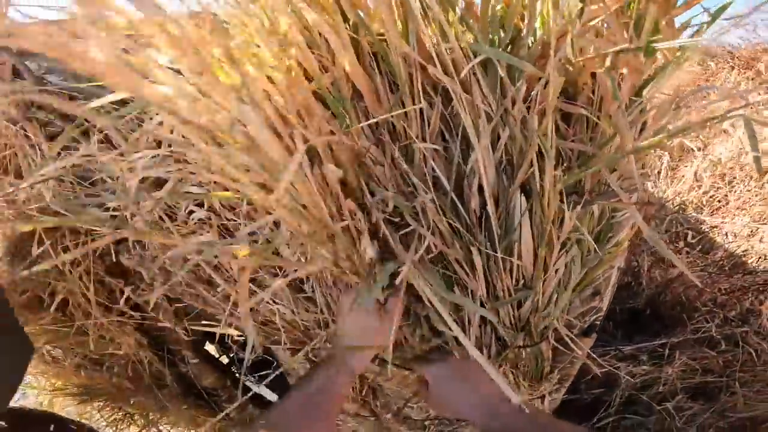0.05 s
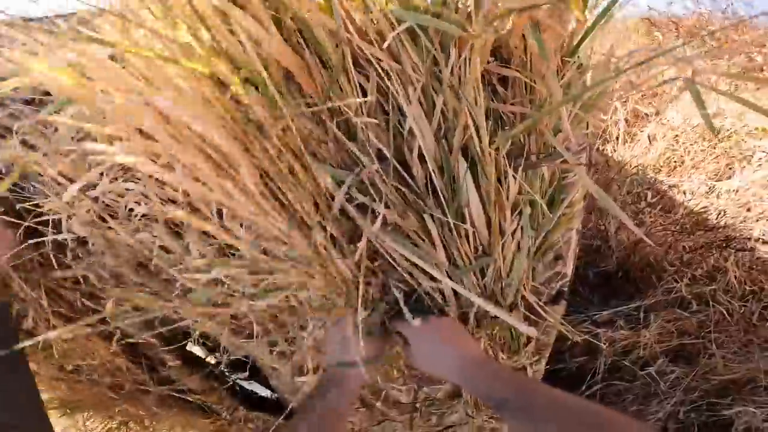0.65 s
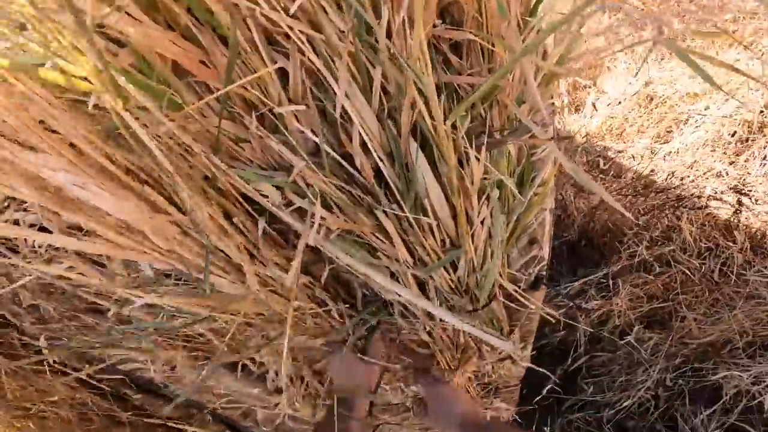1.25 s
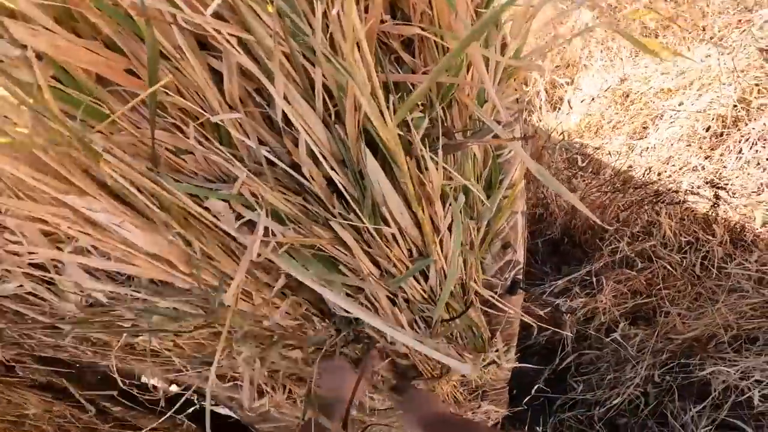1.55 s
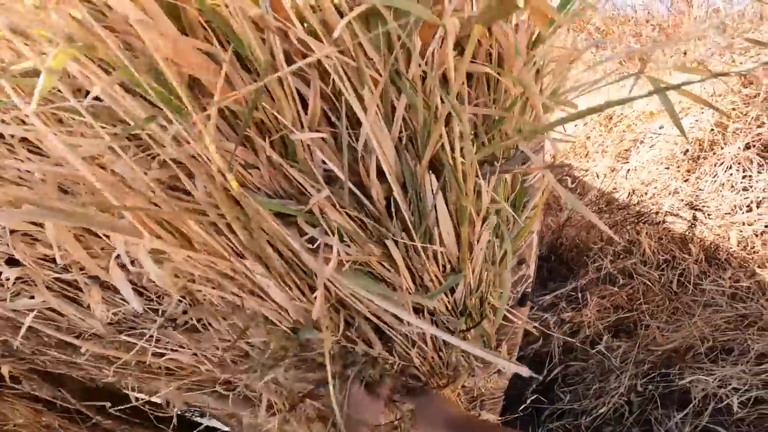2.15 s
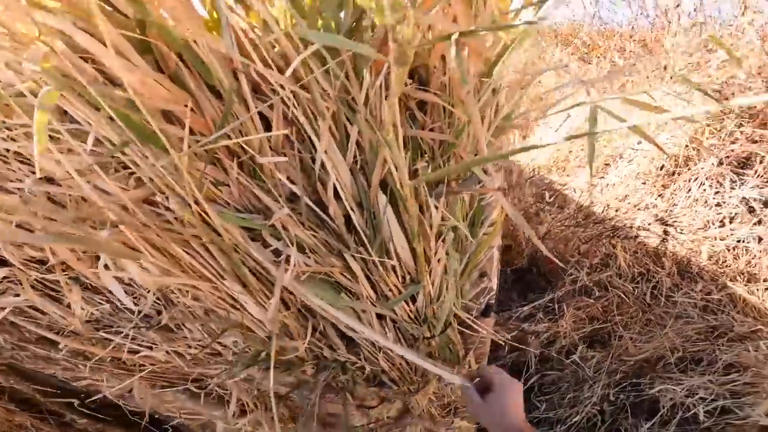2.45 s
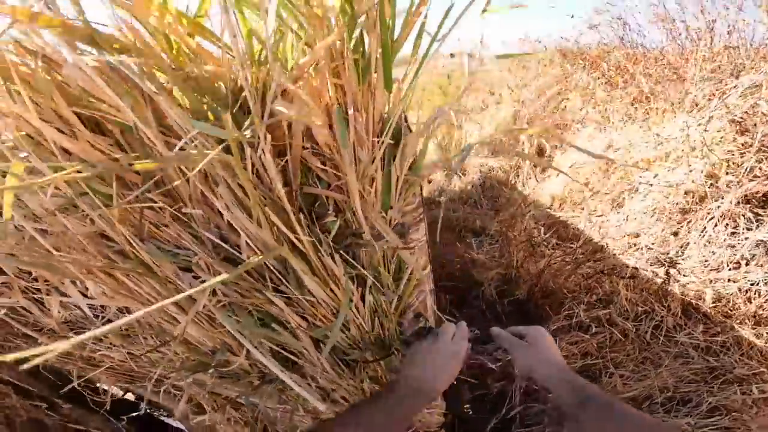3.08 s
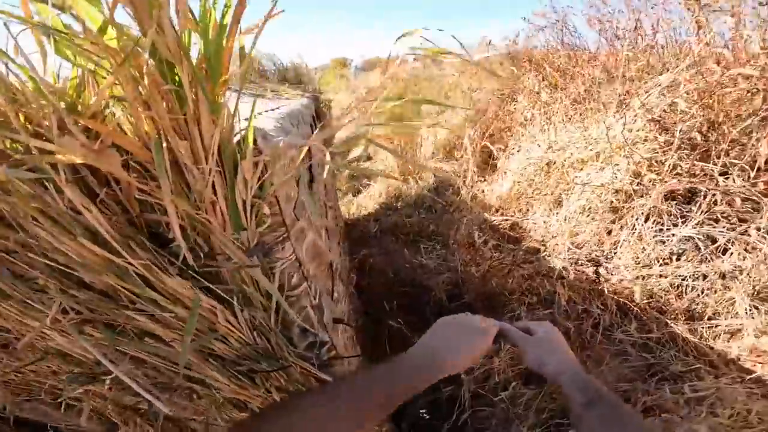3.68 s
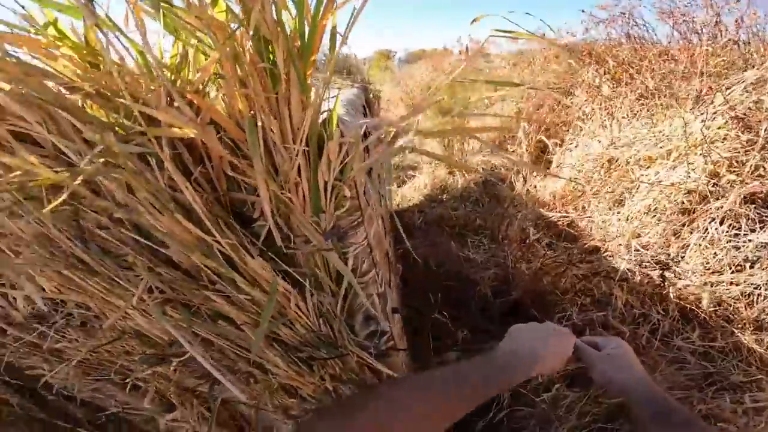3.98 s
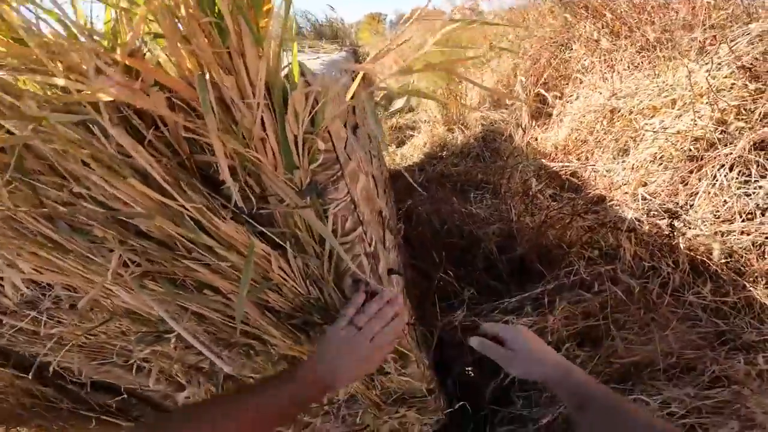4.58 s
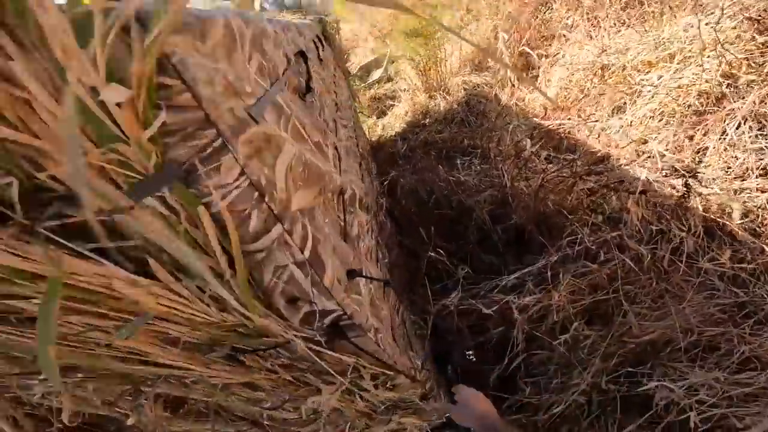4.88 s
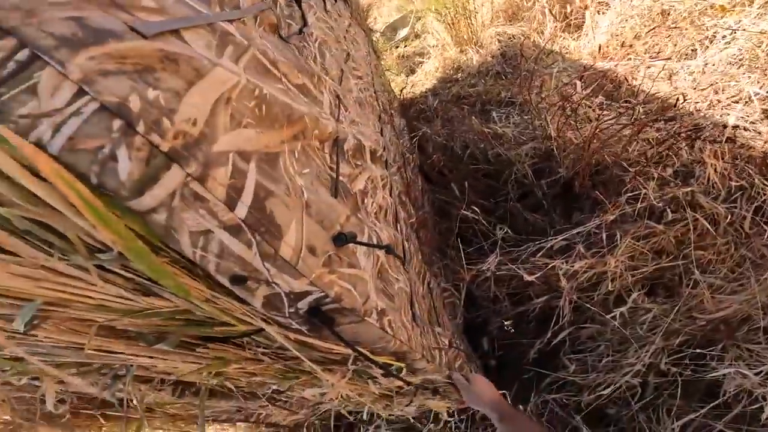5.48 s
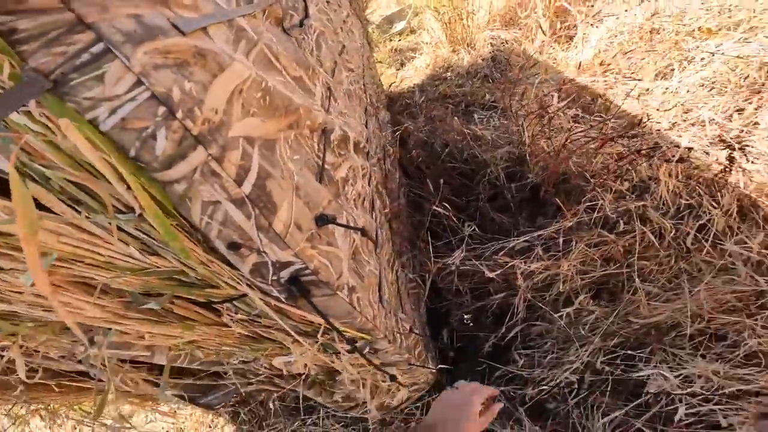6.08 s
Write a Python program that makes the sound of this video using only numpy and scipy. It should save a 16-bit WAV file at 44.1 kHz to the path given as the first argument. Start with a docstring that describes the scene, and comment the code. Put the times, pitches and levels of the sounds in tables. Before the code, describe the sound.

Dry reeds rustle, crackle and scrape close up as hands push and tie them onto a hunting blind, with wind buffeting the microphone.

```python
"""Dry reed grass, pushed by hand onto a hunting blind and tied down, close to a body-worn camera.
Slipping leaves rasp and hiss; stiff stalks crack, scrape the blind and rub and bump the camera case.
The tie cord zips and creaks, and a hand knocks the frame.
After an opening low handling thump on the camera, wind gusts buffet the microphone.
A faint far-off drone shows over the open field in the lull. Midway the top treble turns dull and mono."""
import sys
import numpy as np
from scipy.fft import rfft, irfft, next_fast_len
from scipy.io import wavfile
from scipy.ndimage import uniform_filter1d, map_coordinates

SR = 44100
rng = np.random.default_rng(int(sys.argv[2]) if len(sys.argv) > 2 else 0)


def int16_out(signal):
    """Quantize to a 16-bit WAV file."""
    q = np.round(np.clip(np.atleast_2d(signal).T, -1, 1) * 32767)
    wavfile.write(sys.argv[1], SR, q.astype(np.int16))


N = 279726

# hands pushing the bundle: start_s, length_s, rasp_db, hiss_db
PUSHES = [(0.0, 0.17, -36, -42.5), (0.12, 0.16, -39, -42.5), (0.29, 0.12, -43, -40.5),
          (0.52, 0.063, -39.5, -38.5), (0.6, 0.11, -47, -49), (0.7, 0.068, -37, -37),
          (0.81, 0.16, -52, -44.5), (1.12, .07, -42.5, -47.5), (1.22, 0.12, -41, -45),
          (1.46, 0.23, -40.5, -45), (1.65, 0.066, -35, -41), (1.815, 0.15, -36.5, -40.5),
          (2.035, 0.17, -42, -43.5), (2.2, 0.12, -42, -41.5), (2.335, 0.076, -37.5, -44.5),
          (2.56, 0.16, -42, -61), (2.66, 0.14, -37, -48), (2.86, 0.16, -46, -49.5),
          (3.01, 0.21, -42.5, -43), (3.19, 0.15, -39.5, -47.5), (3.46, 0.075, -46.5, -52),
          (3.735, .06, -51.5, -52), (3.84, 0.12, -53, -46), (3.925, 0.13, -46, -39),
          (4.12, 0.18, -48.5, -48.5), (4.22, .17, -39, -39), (4.48, 0.12, -47.5, -50),
          (5.39, .12, -74, -63), (5.6, .06, -56, -63), (5.665, .065, -44.5, -48.5), (5.74, .14, -44, -49),
          (5.955, 0.17, -41.5, -49.5)]
# leaves settling between pushes: time_s, rasp_db, hiss_db
SETTLING = [(0, -41.5, -45.5), (0.48, -40, -42.5), (1.02, -45.5, -48.5), (1.42, -45, -46.5),
            (1.79, -51, -54), (2.01, -51, -56), (2.5, -44, -51), (3.3, -43.5, -51.5), (3.7, -53, -65),
            (4.1, -50, -46.5), (4.6, -51.5, -51), (5.05, -57.5, -76), (5.55, -61.5, -66),
            (5.92, -47.5, -58), (6.34, -57, -57.5)]


def leaf_levels():
    """Pushes stir the leaves, which keep settling in between: rasp and hiss curves in dB."""
    return strokes(PUSHES, curves(SETTLING), attack_s=0.038, release_s=0.039, build_db=1)


# coarse leaf spectrum: freq_hz, gain_db
RASP_SPECTRUM = [(300, -41), (900, -1.5), (1500, 0.5), (3200, -1.5), (5000, -8.5), (7500, -15.5),
                 (11000, -36), (16000, -40)]
# fine leaf spectrum: freq_hz, gain_db
HISS_SPECTRUM = [(1200, -18), (3000, -1), (4800, 0), (6300, -2.5), (7500, -2), (9000, -11), (10800, -13.5),
                 (13000, -18), (16000, -17)]


def leaves(rasp_db, hiss_db):
    """Crushed blades rasp; blades that slide quickly hiss brighter."""
    rasp = amp(rasp_db) * coloured(friction(), RASP_SPECTRUM)
    hiss = amp(hiss_db) * coloured(friction(), HISS_SPECTRUM)
    return rasp + hiss


def friction():
    """Countless blade tips slip: a hiss with clumps of crackle."""
    crackle = slips(rate_hz=6000, spread_db=1.5, low_hz=863, high_hz=16100, cycles=1.54, samples=128)
    return unit(crackle * amp(0.66 * wobble(70)) + rng.standard_normal(N))


def leaf_fizz(rasp_db, hiss_db):
    """The finest crackle spurts and resonates in the two microphone ports, differently in each."""
    crackle = [slips(rate_hz=4300, spread_db=1.5, low_hz=10700, high_hz=15800, cycles=20, samples=64)
               for port in range(2)]
    ports = unit(filtered(np.array(crackle), lambda hz: resonance(hz, 12900, 2100) ** 2))
    level_db = 0.31 * rasp_db + 0.69 * hiss_db - 6
    spurts_db = 1.6 * wobble(22.03)
    balance_db = [[2.2], [-2.2]]
    return np.sqrt(treble_share()) * amp(level_db + spurts_db) * amp(balance_db) * ports


# stalks dragged over blind and camera: start_s, length_s, level_db
DRAGS = [(0.034, 0.097, -24), (0.13, 0.091, -33.5), (0.29, .035, -34), (0.33, 0.029, -29.5),
         (0.54, 0.066, -34), (0.72, 0.075, -38.5), (0.86, 0.05, -44), (1.07, 0.032, -37.5),
         (1.14, 0.053, -41), (1.245, 0.096, -34.5), (1.37, 0.36, -40.5), (1.68, 0.061, -25.5),
         (1.815, 0.16, -29.5), (2.12, .14, -40.5), (2.26, .05, -32), (3.19, 0.19, -42), (3.39, 0.25, -46),
         (4.21, 0.2, -41.5), (4.64, 0.34, -50), (5.77, 0.032, -41), (5.97, .15, -38)]
# stalk scrape spectrum: freq_hz, gain_db
SCRAPE_SPECTRUM = [(90, -28), (170, -2.5), (280, 0.5), (390, -3), (520, -2), (720, -6.5), (950, -8),
                   (1350, -12), (2200, -18), (4000, -33), (9000, -50)]
# rubbed camera case spectrum: freq_hz, gain_db
CASE_SPECTRUM = [(60, -31), (110, -26), (160, 5.5), (220, -8.5), (290, -1), (450, -14.5), (900, -30),
                 (2500, -43)]


def stalks(rasp_db):
    """Stems brush along with the leaves and drag; pressed hard, they make the camera case boom."""
    brush_db = rasp_db - 2.5
    stalk_db, = strokes(DRAGS, brush_db, attack_s=0.012, release_s=0.017, build_db=-1)
    pressed = 1 / (1 + amp(-2.5 * (stalk_db + 35.5)))  # 0-1, half at -35.5 dB
    scrape = amp(stalk_db - 1.36 * pressed) * coloured(judder(), SCRAPE_SPECTRUM)
    boom = steadied(coloured(judder(), CASE_SPECTRUM), span_s=0.059)
    return scrape + pressed * amp(stalk_db - 4.1) * boom


def judder():
    """Stiff stems catch and slip, coarse and low."""
    catches = slips(rate_hz=1700, spread_db=2.5, low_hz=130.2, high_hz=4000, cycles=1.46, samples=800)
    return unit(catches * amp(0.95 * wobble(45)) + 1.15 * rng.standard_normal(N))


# reeds on the camera: peak_s, sigma_s, pitch_hz, width_hz, level_db
REED_SCRAPES = [(.052, 0.026, 930, 410, -31), (.055, 0.015, 1350, 300, -26.5),
                (.083, 0.018, 1860, 410, -35), (.1, 0.016, 2770, 480, -32), (.119, 0.013, 1180, 690, -29),
                (1.88, .04, 320, 380, -30), (5.8, 0.11, 1360, 410, -52), (6.0, .015, 1300, 1640, -42.5)]


def hollow_reeds():
    """Hollow reeds ring as they drag over the camera."""
    return scrapes(REED_SCRAPES)


# stalks cracking: start_s, level_db, pitch_hz
CRACKS = [(0.0224, -11, 1200), (0.3152, -20, 1200), (0.3527, -18, 4300), (0.4465, -15, 2740),
          (1.1533, -27, 2120), (1.736, -23, 1890), (2.8014, -25, 1900), (3.0345, -31, 1920),
          (3.2504, -20, 1800), (4.271, -22, 4880), (5.689, -27, 2920), (5.867, -24, 1450)]
# blade tips flicking: start_s, level_db
FLICKS = [(1.5444, -25), (1.719, -18.5), (2.293, -23), (3.7738, -40), (5.8744, -37), (6.0774, -35)]


def snaps():
    """Stalks crack with a short hollow ring; thin blade tips flick far higher."""
    cracks = blows(CRACKS, cycles=2.4, noise_gain=0.58, noise_t60_s=0.018)
    cracks = filtered(cracks, lambda hz: resonance(hz, 2800, 4000))
    flicks = blows([(s, db, 13000) for s, db in FLICKS], cycles=4, noise_gain=1.5, noise_t60_s=0.009)
    flicks = filtered(flicks, lambda hz: resonance(hz, 14000, 9000))
    return cracks + flicks


# soft contacts: start_s, level_db, pitch_hz
BUMPS = [(0.012, -8, 202), (0.023, -4, 160), (0.04, -4.5, 227), (0.111, -14, 241), (0.353, -28, 175),
         (2.307, -19, 160), (2.628, -24, 280), (4.379, -35, 121), (4.523, -28.5, 262)]


def bumps():
    """Stalks and hands knock near the camera, with little treble."""
    knocks = blows(BUMPS, cycles=1.4, noise_gain=0.75, noise_t60_s=0.015)
    return filtered(knocks, lambda hz: 1 / (1 + 1j * hz / 1800) ** 2)


# blind frame modes: pitch_hz, gain_db, t60_s
FRAME_MODES = [(417, 1.5, 0.05), (497, -1.5, 0.064), (1480, -11, 0.018), (3340, -14, .016)]


def frame_knock(start_s=4.884, gain_db=-28):
    """The hollow frame rings briefly under a hand."""
    t = np.maximum(np.arange(N) / SR - start_s, 0)
    ring = sum(amp(db - 60 * t / t60_s) * np.sin(2 * np.pi * hz * t) for hz, db, t60_s in FRAME_MODES)
    return amp(gain_db) * ring


# cord pulls: start_s, length_s, level_db
PULLS = [(3.84, .22, -54), (4.23, .17, -55), (4.5, 0.13, -54), (5.39, 0.13, -63.5)]
# cord creaks: peak_s, sigma_s, pitch_hz, width_hz, level_db
CREAKS = [(3.32, 0.089, 480, 280, -40.5), (3.28, .06, 1360, 750, -42), (4.36, 0.051, 490, 300, -38),
          (4.926, .02, 3450, 420, -55.5)]


def tie_cord():
    """Taut cord zips through the fingers with a narrow hiss and creaks on the frame."""
    pull_db, = strokes(PULLS, rest_db=-np.inf, attack_s=0.063, release_s=0.044, build_db=1)
    hiss = unit(filtered(friction(), lambda hz: resonance(hz, 7200, 1100) ** 2))
    return amp(pull_db) * hiss + scrapes(CREAKS)


# handling thump (first row), then wind gusts: start_s, length_s, buffet_db, flutter_db
THUMP_AND_GUSTS = [(0.005, 0.034, -40, -23), (0.54, 0.11, -31.5, -39), (0.7, .08, -26, -28),
                   (0.78, 0.12, -30, -37), (1.36, 0.067, -31, -44), (1.87, 0.12, -40, -39.5),
                   (2.205, 0.1, -19, -26), (2.32, 0.094, -19.5, -31), (2.47, .09, -29.5, -33),
                   (2.575, .1, -22, -21), (2.69, 0.12, -26, -34), (2.79, 0.17, -28.5, -28.5),
                   (3.01, 0.15, -27, -29.5), (3.41, 0.058, -26, -42), (3.49, 0.064, -31.5, -40.5),
                   (4.26, 0.23, -37, -41), (4.765, .055, -32, -32), (4.87, 0.081, -31, -33.5),
                   (5.88, 0.11, -38, -48), (6.15, 0.035, -37, -35), (6.22, 0.16, -34.5, -44)]
# underlying breeze: time_s, buffet_db, flutter_db
BREEZE = [(0, -36, -38), (1.1, -39, -42.5), (1.65, -41.5, -42.5), (2.1, -42.5, -51), (3.3, -39.5, -40.5),
          (3.75, -42, -50.5), (4.15, -39.5, -53), (4.6, -38.5, -44), (5.1, -38, -51), (5.35, -38.5, -52.5),
          (5.52, -53, -61), (5.75, -38.5, -41), (6.34, -38, -45.5)]
# slow buffet spectrum: freq_hz, gain_db
BUFFET_SPECTRUM = [(8, -12), (20, -4.5), (34, 0), (60, -8), (100, -24), (250, -41), (800, -92)]
# fast flutter spectrum: freq_hz, gain_db
FLUTTER_SPECTRUM = [(35, -19), (72, 1.5), (100, -1.5), (135, -3.5), (200, -9), (300, -21), (600, -33),
                    (2000, -59)]


def thump_and_wind():
    """A low handling thump on the camera opens; then wind eddies heave and flutter at the microphone."""
    buffet_db, flutter_db = strokes(THUMP_AND_GUSTS, curves(BREEZE),
                                    attack_s=0.032, release_s=0.032, build_db=-1.5)
    buffet = steadied(coloured(rng.standard_normal(N), BUFFET_SPECTRUM), span_s=0.15)
    flutter = steadied(coloured(rng.standard_normal(N), FLUTTER_SPECTRUM), span_s=0.05)
    return amp(buffet_db) * buffet + amp(flutter_db + 2.34 * wobble(50)) * flutter


# lower drone partials: pitch_hz, gain_db
DRONE_PARTIALS = [(432, -3.5), (864, -1)]
# drone swell: time_s, lower_db, whine_db
DRONE_SWELL = [(0, -65, -72), (2.6, -54, -61), (3.7, -55.5, -65), (4.3, -66, -66), (4.8, -56, -62),
               (5.0, -64, -55), (5.07, -62, -48.5), (5.13, -60.5, -56), (5.45, -59.5, -60.5),
               (5.8, -61, -63), (6.34, -68, -68)]


def far_drone(whine_hz=1301, waver_db=1.8):
    """Two partials and a thin whine swell far away, wavering in level and phase."""
    def tone(hz):
        return amp(waver_db * wobble(20)) * np.sin(2 * np.pi * hz * t + 1.15 * wobble(35))

    t = np.arange(N) / SR
    lower_db, whine_db = curves(DRONE_SWELL)
    lower = unit(sum(amp(db) * tone(hz) for hz, db in DRONE_PARTIALS))
    return amp(lower_db) * lower + amp(whine_db) * unit(tone(whine_hz))


# open field spectrum: freq_hz, gain_db
FIELD_SPECTRUM = [(100, 1.5), (350, -2.5), (600, -9.5), (830, 0), (1020, -12), (1330, -1), (1650, -10.5),
                  (2300, -22), (3400, -11), (5200, -31), (7200, -18), (10000, -27), (16000, -43)]


def field_hush():
    """The open field gives a faint steady noise."""
    return amp(-52) * coloured(rng.standard_normal(N), FIELD_SPECTRUM)


# top treble let through: time_s, open_share
TREBLE_SHARE = [(0, 0.67), (2.3, 0.85), (2.38, 0), (3.8, 0), (4.15, .2), (4.3, 0.5), (4.55, 1), (6.34, 0.6)]


def treble_share():
    """Share of the sound that keeps its top treble, 0-1."""
    return np.clip(curves(TREBLE_SHARE)[0], 0, 1)


def slips(rate_hz, spread_db, low_hz, high_hz, cycles, samples):
    """Random stick-slip ticks, each a short ring at its own pitch."""
    when, place, force, phase = rng.random((int(rate_hz * N / SR), 4)).T[:, :, None]
    hz = low_hz * (high_hz / low_hz) ** place
    strength = hz * amp(spread_db * np.minimum(-np.log(1 - force), 4))
    turns = hz * np.arange(samples) / SR
    rings = strength * np.exp(-turns / cycles) * np.sin(2 * np.pi * (turns + phase))
    index = (when * N).astype(int) + np.arange(samples)
    return unit(np.bincount(index.ravel(), rings.ravel(), N)[:N])


def blows(table, cycles, noise_gain, noise_t60_s):
    """Each contact is a heavily damped ring with a short burst of noise."""
    out, t = np.zeros(N + SR), np.arange(SR // 10) / SR
    for start_s, db, hz in table:
        ring = np.sin(2 * np.pi * hz * t) * np.exp(-hz * t / cycles)
        hit = ring + noise_gain * rng.standard_normal(len(t)) * amp(-60 * t / noise_t60_s)
        out[round(start_s * SR):][:len(t)] += amp(db) * hit / np.abs(hit).max()
    return out[:N]


def scrapes(table):
    """Each scrape swells and fades, its friction noise ringing one resonance."""
    out, t = np.zeros(N), np.arange(N) / SR
    for peak_s, sigma_s, pitch_hz, width_hz, db in table:
        ring = unit(filtered(rng.standard_normal(N), lambda hz: resonance(hz, pitch_hz, width_hz) ** 2))
        out += amp(db) * np.exp(-((t - peak_s) / sigma_s) ** 2 / 2) * ring
    return out


def strokes(table, rest_db, attack_s, release_s, build_db):
    """Strokes rise, change by build_db and die away over rest_db; one dB curve per level column."""
    t = np.arange(N) / SR
    grid_s = t[::64]
    power = 0
    for start_s, length_s, *db in table:
        age_s = grid_s - start_s
        rise = np.clip(age_s / attack_s, 0, 1)
        fall = np.exp(-np.maximum(age_s - length_s, 0) / release_s)
        build = amp(build_db * (np.clip(age_s / length_s, 0, 1) - 0.5))
        power = power + np.outer(amp(db), rise * fall * build) ** 2
    power = np.array([np.interp(t, grid_s, p) for p in power])
    return 10 * np.log10(power + amp(rest_db) ** 2 + 1e-20)


def amp(db):
    """Decibels to gain."""
    return 10 ** (np.asarray(db) / 20)


def unit(x):
    """Scale to rms 1."""
    return x / np.sqrt(np.mean(x ** 2) + 1e-20)


def curves(rows):
    """One value per sample for each column after the time."""
    time_s, *columns = np.transpose(rows)
    return [np.interp(np.arange(N) / SR, time_s, column) for column in columns]


def wobble(rate_hz):
    """Smooth random curve, rate_hz knots a second."""
    knots = rng.standard_normal(int(N * rate_hz / SR) + 4)
    return map_coordinates(knots, [np.arange(N) * rate_hz / SR])


def filtered(x, response):
    """Apply a frequency response."""
    size = next_fast_len(N + 8192)
    return irfft(rfft(x, size) * response(np.fft.rfftfreq(size, 1 / SR)), size)[..., :N]


def coloured(x, spectrum):
    """Shape by (freq_hz, gain_db) points, to rms 1."""
    freq_hz, gain_db = np.transpose(spectrum)
    return unit(filtered(x, lambda hz: amp(np.interp(np.log(hz + 1), np.log(freq_hz), gain_db))))


def resonance(hz, centre_hz, width_hz):
    """Response of one damped mode."""
    return 1j * hz * width_hz / (centre_hz ** 2 - hz ** 2 + 1j * hz * width_hz)


def steadied(x, span_s):
    """Even out the level over span_s, to rms 1."""
    size = int(span_s * SR)
    power = uniform_filter1d(uniform_filter1d(x ** 2, size), size)
    return unit(x / np.sqrt(np.abs(power) + 0.022))


def scene():
    """Everything is centred except the leaf fizz."""
    rasp_db, hiss_db = leaf_levels()
    grass = leaves(rasp_db, hiss_db) + stalks(rasp_db) + hollow_reeds() + snaps()
    tying = tie_cord() + bumps() + frame_knock()
    return grass + tying + thump_and_wind() + far_drone() + field_hush() + leaf_fizz(rasp_db, hiss_db)


def record(dry, dull_hz=11900, top_hz=15800):
    """The top dulls and narrows to mono through the windy middle; nothing passes above top_hz."""
    share = treble_share()
    dull = filtered(dry.mean(axis=0), lambda hz: 1 / np.sqrt(1 + (hz / dull_hz) ** 26))
    return filtered(share * dry + (1 - share) * dull, lambda hz: hz < top_hz)


dry = scene()
out = record(dry)
int16_out(out)
```